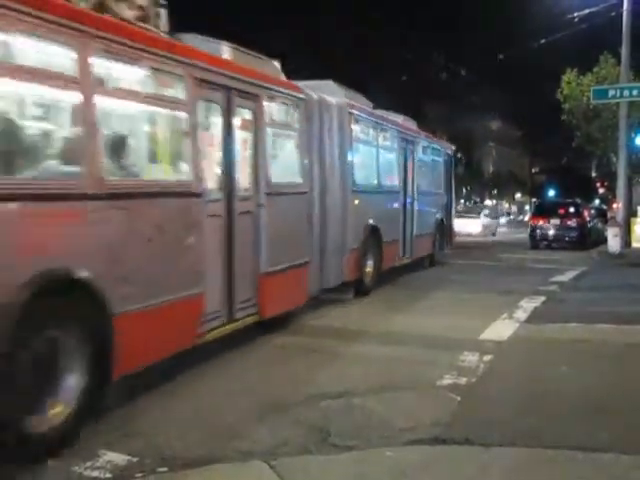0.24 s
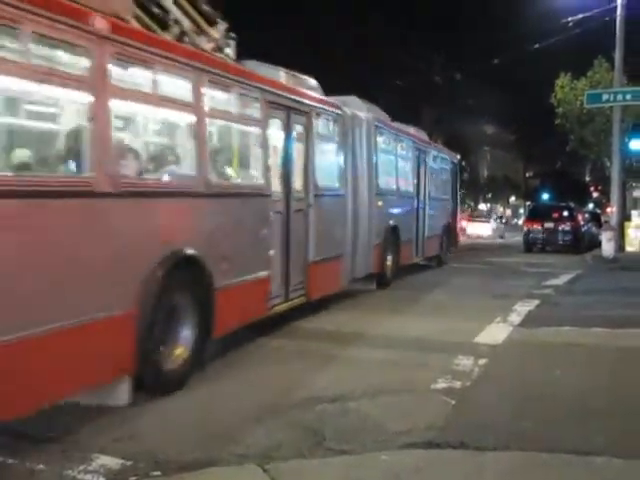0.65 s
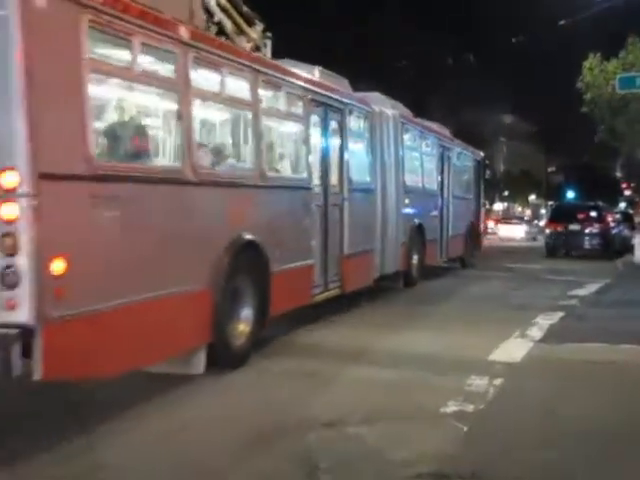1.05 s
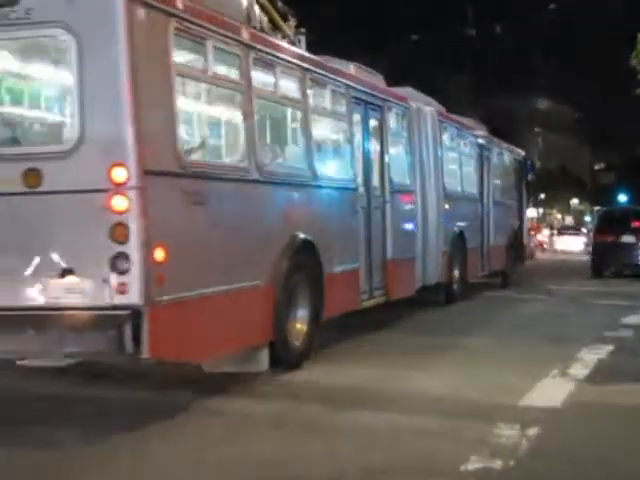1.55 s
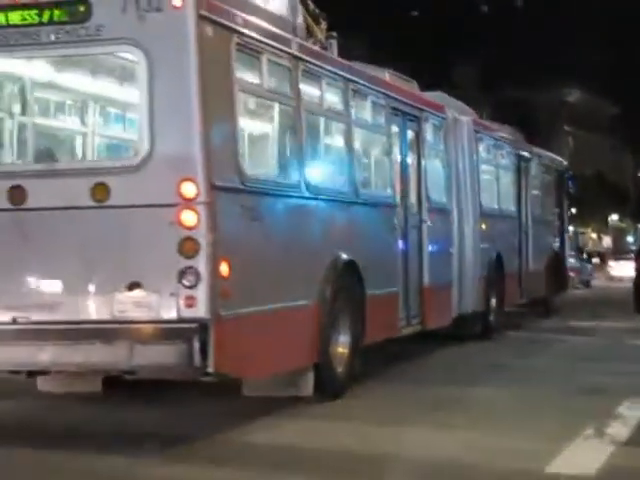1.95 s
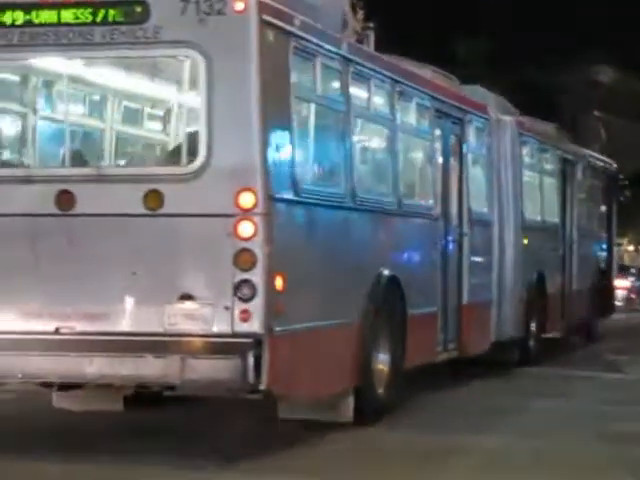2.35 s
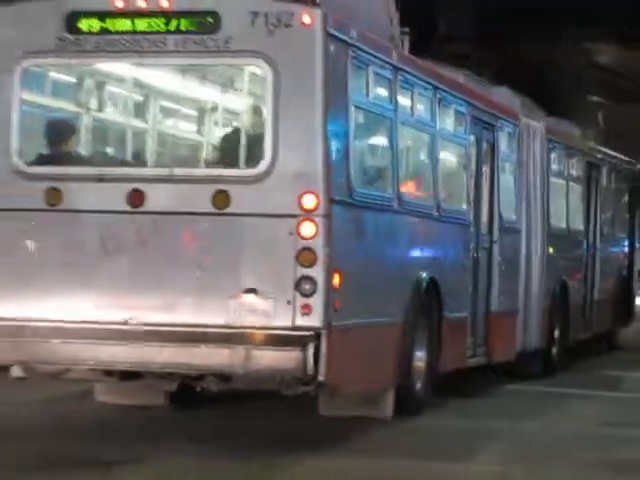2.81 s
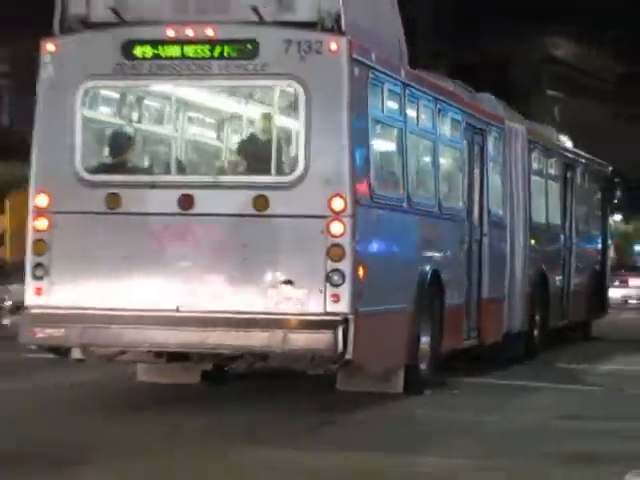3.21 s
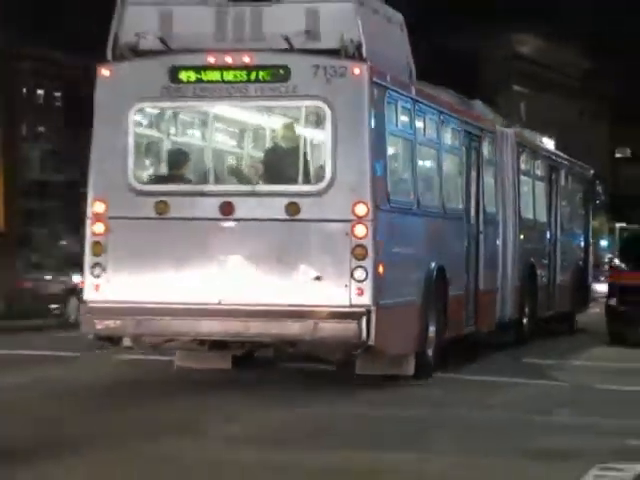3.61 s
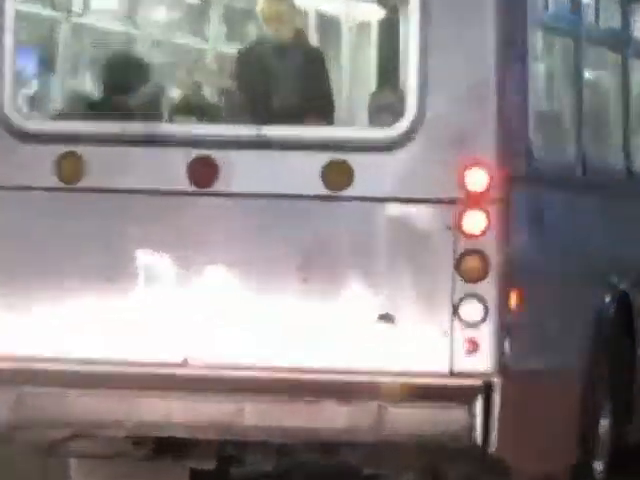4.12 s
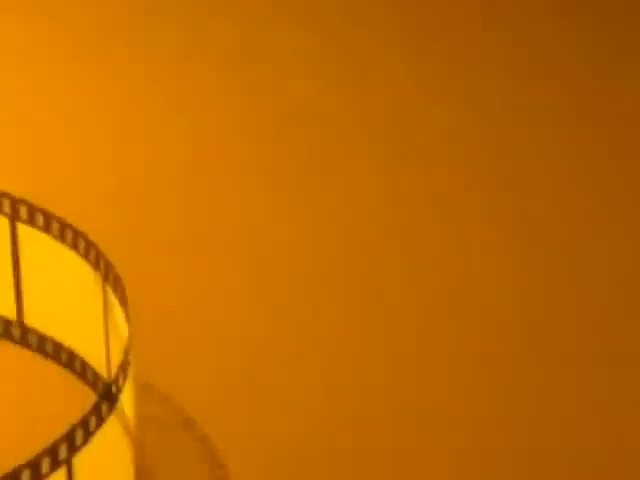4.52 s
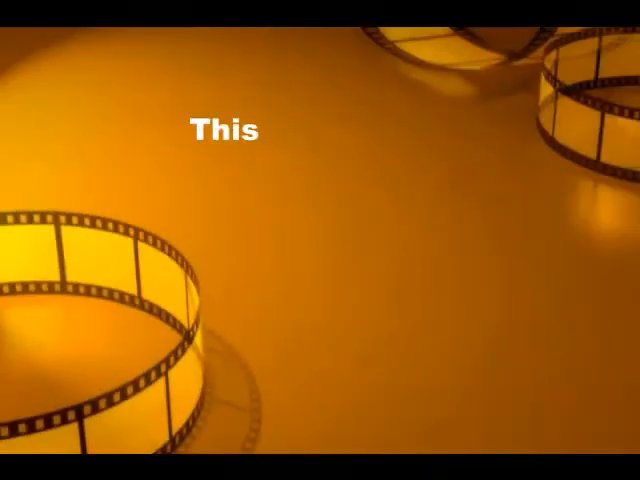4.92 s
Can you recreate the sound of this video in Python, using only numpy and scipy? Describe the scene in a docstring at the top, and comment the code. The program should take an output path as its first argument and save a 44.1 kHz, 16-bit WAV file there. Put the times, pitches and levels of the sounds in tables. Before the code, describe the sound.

Heard from the kerbside, a big electric bus pulls away with a loud continuous rush of tyres, air and muffled rumble. The opening is brightest, with hissing vents, light rasps and faint high whines. Small rattling clicks and dull bumps dot the pass; the roar swells and flutters slightly. A low fan hum hides under the later part, then everything fades evenly. Close open-air stereo pickup, no speech.

```python
"""An articulated trolleybus rolls close past the listener and pulls away along a street.
From the start, shaped noise makes body rumble, tyre roar, cooling air and hiss. Vents, rasps and a squeal
pass early, overlapped by sine whistles and a thin switching whine; resonant clicks, bumps and low hum join.
The wire sizzles now and then in noise swells; the tail fan drones in the later part. A fade-out ends it."""
import sys
import numpy as np
from scipy import signal
from scipy.fft import rfft, irfft, next_fast_len
from scipy.io import wavfile
from scipy.ndimage import uniform_filter1d, map_coordinates

SR = 44100
rng = np.random.default_rng(int(sys.argv[2]) if len(sys.argv) > 2 else 0)


def generate_wav(signal):
    """Clip the signal to [-1, 1] and save it as 16-bit WAV at the path in sys.argv[1]."""
    frames = np.transpose(np.atleast_2d(signal))
    scaled = np.clip(frames, -1, 1) * 32767
    pcm = np.round(scaled).astype(np.int16)
    wavfile.write(sys.argv[1], SR, pcm)


N = 227600
T = np.arange(N) / SR  # s

# stereo width of all noise: freq_hz, side_minus_mid_db
STEREO_WIDTH = [(60, -13.5), (99, -18), (160, -22.5), (270, -20), (450, -14.5), (740, -14), (1220, -8),
                (2010, -3.5), (3320, -1.5), (5480, 2), (9050, 1.5), (14900, 2.5)]
# stereo balance of all noise: freq_hz, left_minus_right_db
STEREO_LEAN = [(60, .3), (200, -.5), (700, -.7), (1290, -1.8), (2370, .8), (4400, -.5), (8000, -3),
               (14000, -2.5)]

# body rumble spectrum: freq_hz, relative_density_db
RUMBLE_SPECTRUM = [(15, -56), (24, -34), (45, -18.5), (65, -12.5), (105, -5.5), (170, -6), (250, -1),
                   (295, -3), (370, -6.5), (450, -12), (600, -14.5), (1000, -84)]
# tyre roar spectrum: freq_hz, relative_density_db
TYRE_SPECTRUM = [(250, -32), (380, -17.5), (460, -8.5), (540, -3), (630, 0.5), (780, 0), (990, 1),
                 (1150, -3.5), (1350, -13), (1700, -23), (2800, -84.5)]
# cooling air spectrum: freq_hz, relative_density_db
AIR_SPECTRUM = [(650, -13), (1100, -3.5), (1320, -1.5), (1560, -1), (1920, -4.5), (2260, -4), (2910, -15),
                (3300, -18.5), (4290, -31.5), (7260, -120)]
# rolling hiss spectrum: freq_hz, relative_density_db
HISS_SPECTRUM = [(2400, -38), (3000, -1), (3800, 0.5), (4400, -2), (5100, -6.5), (6500, -10.5), (8000, -14),
                 (9500, -19), (10800, -30.5), (12500, -56.5)]
# swells (+) and dips (-) of the tyre roar: peak_s, half_length_s, change_db
TYRE_SWELLS = [(.56, .04, .7), (.69, .06, 1.3), (.92, .04, 1.5), (1.06, .04, 2), (1.21, .04, 3.3),
               (1.35, .04, 1), (1.85, .14, 2), (2.08, .06, -1), (2.28, .07, 2.2), (2.42, .04, 1.7),
               (2.8, .068, 1.2), (3.16, .04, 2), (3.26, .08, 1.8), (3.55, .11, -1.6), (3.77, .05, 1.2)]
RUMBLE_DB, TYRE_DB, AIR_DB, HISS_DB = -25, -20.5, -20, -35.5  # before dips, swells and road grain
RUMBLE_RISE_DB, RUMBLE_RISE_S = 0.3, .6  # rear wheels come near
RUMBLE_DIP_DB, RUMBLE_DIP_S, RUMBLE_DIP_HALF_S = -1.2, 2.15, .3  # tail swings round
TYRE_RISE_DB, TYRE_RISE_S = 2, 0.96  # rear axle rolls by
AIR_RISE_DB, AIR_RISE_S = 4, 1.9  # tail turns toward the listener
SWELL_AIR_SHARE = 0.24  # share of the tyre-swell dB that reaches the cooling air
FLANK_DB, FLANK_HALF_S = 2, 0.52  # extra hiss while the flank is close
SHADE_DB, SHADE_S, SHADE_HALF_S = -1.5, .8, 0.14  # closed rear panel nearest

# vent hiss spectrum: freq_hz, relative_density_db
VENT_SPECTRUM = [(2000, -37), (3300, -3), (5000, 3.5), (7000, -4), (9000, -2), (11000, -2.5),
                 (13000, -13.5), (14000, -42)]
# side vents going by: nearest_s, half_length_s, peak_db
VENT_PASSES = [(.02, 0.22, -36), (.47, 0.098, -38)]
VENT_PATCHY_DB = 1.5

# rasps of the passing flank: peak_s, half_length_s, centre_hz, half_width_hz, peak_db
FLANK_RASPS = [(.08, 0.17, 3780, 450, -48), (.47, .08, 3600, 498, -43)]

# squeal pitch: time_s, pitch_hz
SQUEAL_PITCH = [(0, 7540), (.1, 7610), (.19, 7520), (.26, 7610), (.34, 7670), (.5, 7620)]
SQUEAL_S, SQUEAL_HALF_S, SQUEAL_HALF_WIDTH_HZ, SQUEAL_DB = .21, .23, 65, -45

# drive whistles as they face the listener: peak_s, half_length_s, pitch_hz (before Doppler), peak_db
DRIVE_WHISTLES = [(.34, .1, 6066, -50), (.8, .42, 6062, -48), (.78, .28, 5864, -48.5),
                  (1.37, .16, 5864, -47.5), (1.68, .4, 5862, -51.5)]
# breathy whistles beamed sideways: nearest_s, half_length_s, centre_hz, half_width_hz, peak_db
SIDE_BEAMS = [(.265, .03, 9470, 60, -46), (.5, .08, 9470, 45, -49), (.42, .17, 5935, 80, -45.5),
              (.72, .12, 5910, 70, -50)]
DOPPLER_SHARE = .004  # pitch swing either way
PASS_S, PASS_HALF_S = .6, .5

# switching whine: centre_hz (before drift), half_width_hz, base_db, near_swell_db
SWITCHING_BANDS = [(14660, 75, -58, 13), (14910, 60, -59, 4)]
# drift of both bands: time_s, offset_hz
SWITCHING_DRIFT = [(.3, 150), (.55, 50), (.9, 10), (1.9, 0), (2.5, 35)]
SWITCH_ON_S, SWITCH_OFF_S, SWITCH_EDGE_S = 0.26, 2.75, .08  # motor pulling
SWITCH_NEAR_S, SWITCH_NEAR_HALF_S = .88, .22  # cabinet nearest

# clicks of fittings: start_s, gain_db, centre_hz, half_width_hz, t60_s, left_minus_right_db
FITTING_CLICKS = [(.342, -31, 4650, 1300, .05, 0), (.355, -31, 4650, 1300, .03, 0),
                  (.7195, -12.3, 2750, 1250, .016, 10), (2.582, -23, 3216, 1600, .03, 0),
                  (3.136, -25, 3000, 1200, .04, 0), (3.405, -28.5, 4250, 1400, .035, 0),
                  (3.467, -29.5, 4100, 1700, .03, 0)]

# short bumps and one longer body hum: peak_s, half_length_s, centre_hz, half_width_hz, peak_db
LOW_BUMPS = [(.39, 0.024, 55.4, 30, -32), (.755, 0.018, 106, 35, -23), (1.1, 0.22, 264, 45, -30),
             (1.64, 0.034, 246, 35, -25), (3.39, 0.019, 186.6, 110, -25.5), (3.83, 0.028, 170, 110, -27.5)]

# low roar and hum, overlapping bands: peak_s, half_length_s, centre_hz, half_width_hz, peak_db
ROAR_BANDS = [(1.1, 0.55, 910, 70, -31), (1.68, 0.48, 790, 140, -24), (1.8, .55, 520, 60, -31.5),
              (2.1, 0.46, 112.3, 14, -36.5), (2.75, 0.6, 510, 30, -32.5), (3.2, 0.62, 384, 52, -34)]

# sizzles on the overhead wire: peak_s, half_length_s, centre_hz, half_width_hz, level_db (before crackle)
WIRE_SIZZLES = [(.93, .018, 10000, 1700, -43.5), (.923, .008, 8620, 170, -39.5),
                (1.8, .15, 7000, 2600, -44), (1.82, .11, 11000, 1400, -55), (3.18, .016, 9100, 2100, -41.5)]
CRACKLE_DB = 1.8

FAN_HZ, FAN_HALF_WIDTH_HZ, FAN_DB = 152, 24, -35.5
FAN_S, FAN_EDGE_S = 2.52, .06  # tail comes into view

FADE_START_S, FADE_LENGTH_S = 3.838, 0.95
END_S, CLOSE_S = 4.679, .004  # final decay: start, time constant
TOP_HZ = 15600


def amp(db):
    """dB to gain."""
    return 10 ** (np.asarray(db) / 20)


def unit(x):
    """x at rms 1."""
    return x / np.sqrt(np.mean(x ** 2) + 1e-20)


def along(points, hz):
    """Interpolate (Hz, value) points on a log-frequency axis."""
    freq_hz, values = np.transpose(points)
    return np.interp(np.log(hz + 1), np.log(freq_hz + 1), values)


def wobble(rate_hz):
    """Smooth random curve with rate_hz knots a second."""
    knots = rng.standard_normal(int(N * rate_hz / SR) + 4)
    return map_coordinates(knots, [T * rate_hz])


def bell(peak_s, half_s):
    """Gaussian gain, 1 at peak_s and 1/e half_s away."""
    return np.exp(-((T - peak_s) / half_s) ** 2)


def rise(depth_db, length_s):
    """Level that climbs from depth_db below to 0 dB and holds."""
    return -depth_db * np.maximum(1 - T / length_s, 0)


def passing(rows):
    """Summed gain of things going by."""
    return sum(amp(db) * bell(s, half_s) for s, half_s, db in rows)


def filtered(x, response):
    """Filter x by a gain function of frequency, zero-padded."""
    size = next_fast_len(N + SR // 2)
    gain = response(np.fft.rfftfreq(size, 1 / SR))
    return irfft(rfft(x, size) * gain, size)[..., :N]


def stereo(pair, colour):
    """Colour two noises as mid (rms 1) and side: bass near mono, treble wide."""
    def mid_side_gain(hz):
        return colour(hz) * amp([0 * hz, along(STEREO_WIDTH, hz)])

    def lean_gain(hz):
        return amp(np.outer([.5, -.5], along(STEREO_LEAN, hz)))

    mid, side = filtered(pair, mid_side_gain)
    left_right = np.array([mid + side, mid - side])
    return filtered(left_right, lean_gain) / np.std(mid)


def rush(spectrum, patchy_db):
    """Turbulent noise: random gain patches in time and frequency, then a spectrum."""
    grid = signal.stft(rng.standard_normal((2, N)), nperseg=512)[2]
    patches = rng.standard_normal(grid.shape[1:])
    patches = uniform_filter1d(patches, size=6, axis=0)
    patches = uniform_filter1d(patches, size=12, axis=1, mode="wrap")
    patchy = grid * amp(patchy_db * unit(patches))
    pair = signal.istft(patchy, nperseg=512)[1][:, :N]
    return stereo(pair, lambda hz: amp(along(spectrum, hz)))


def narrow(peaks):
    """Noise in resonances (centre_hz, half_width_hz, db)."""
    def colour(hz):
        return sum(amp(db) / (1 + ((hz - centre_hz) / half_width_hz) ** 2) ** 2
                   for centre_hz, half_width_hz, db in peaks)

    return stereo(rng.standard_normal((2, N)), colour)


def swells(rows):
    """Resonant noises that rise and fall around their moments."""
    return sum(amp(db) * bell(s, half_s) * narrow([(hz, half_width_hz, 0)])
               for s, half_s, hz, half_width_hz, db in rows)


def shifted(x, shift_hz):
    """Shift x in frequency by a curve, via its analytic signal."""
    phase = 2 * np.pi * np.cumsum(shift_hz) / SR
    return np.real(signal.hilbert(x) * np.exp(1j * phase))


def line(hz, flutter_db):
    """Sine whistle fluttering separately in each channel as its echoes shift."""
    phase = 2 * np.pi * np.cumsum(hz) / SR
    channels = [amp(flutter_db * wobble(15)) * np.sin(phase + .7 * wobble(25)) for _ in range(2)]
    return unit(np.array(channels))


def rolling():
    """Body, tyre, air and hiss noise; road grain shakes the upper three together."""
    grain_db = 0.361 * wobble(12) + 0.42 * wobble(130)
    swell_db = sum(db * bell(s, half_s) for s, half_s, db in TYRE_SWELLS)

    body_db = RUMBLE_DB + rise(RUMBLE_RISE_DB, RUMBLE_RISE_S) + 0.38 * wobble(7.8)
    body_db += RUMBLE_DIP_DB * bell(RUMBLE_DIP_S, RUMBLE_DIP_HALF_S)
    tyre_db = TYRE_DB + rise(TYRE_RISE_DB, TYRE_RISE_S) + swell_db + grain_db
    air_db = AIR_DB + rise(AIR_RISE_DB, AIR_RISE_S) + SWELL_AIR_SHARE * swell_db + grain_db
    hiss_db = HISS_DB + FLANK_DB * bell(0, FLANK_HALF_S) + grain_db
    hiss_db += SHADE_DB * bell(SHADE_S, SHADE_HALF_S)

    body = amp(body_db) * rush(RUMBLE_SPECTRUM, patchy_db=0.5)
    tyres = amp(tyre_db) * rush(TYRE_SPECTRUM, patchy_db=-1.0)
    air = amp(air_db) * rush(AIR_SPECTRUM, patchy_db=0.71)
    hiss = amp(hiss_db) * rush(HISS_SPECTRUM, patchy_db=0.9)
    return body + tyres + air + hiss


def vents():
    """Turbulent air from each side vent, bright while it faces the listener."""
    return passing(VENT_PASSES) * rush(VENT_SPECTRUM, VENT_PATCHY_DB)


def rasps():
    """The passing flank rasps in short swells of resonant noise."""
    return swells(FLANK_RASPS)


def squeal():
    """Narrow, breathy noise band that wanders in pitch."""
    centre_hz = np.mean([hz for _, hz in SQUEAL_PITCH])
    drift_hz = np.interp(T, *np.transpose(SQUEAL_PITCH)) - centre_hz
    band = narrow([(centre_hz, SQUEAL_HALF_WIDTH_HZ, 0)])
    return amp(SQUEAL_DB) * bell(SQUEAL_S, SQUEAL_HALF_S) * shifted(band, drift_hz)


def drive():
    """Power electronics: sines whose pitch sinks in passing, plus narrow noise beams."""
    doppler = 1 - DOPPLER_SHARE * np.tanh((T - PASS_S) / PASS_HALF_S)
    whistles = sum(amp(db) * bell(s, half_s) * line(hz * doppler, flutter_db=-1.0)
                   for s, half_s, hz, db in DRIVE_WHISTLES)
    return whistles + swells(SIDE_BEAMS)


def switching():
    """Thin whine in two unsteady noise bands that drift in pitch while the motor pulls."""
    pulling = np.clip(np.minimum(T - SWITCH_ON_S, SWITCH_OFF_S - T) / SWITCH_EDGE_S, 0, 1)
    near = bell(SWITCH_NEAR_S, SWITCH_NEAR_HALF_S)
    bands = sum(amp(db + swell_db * near + 3 * wobble(14)) * narrow([(hz, half_width_hz, 0)])
                for hz, half_width_hz, db, swell_db in SWITCHING_BANDS)
    drift_hz = np.interp(T, *np.transpose(SWITCHING_DRIFT)) + 22 * wobble(12)
    return pulling * shifted(bands, drift_hz)


def fittings():
    """Each click is a noise burst in one broad resonance, quickly damped."""
    out = np.zeros((2, N))
    for start_s, gain_db, hz, half_width_hz, t60_s, lean_db in FITTING_CLICKS:
        age_s = np.maximum(T - start_s, 0)
        attack = 1 - np.exp(-age_s / .0004)
        shape = attack * amp(-60 * age_s / t60_s)
        burst = unit(shape * narrow([(hz, half_width_hz, 0)])) * np.std(shape)
        side_db = lean_db * np.array([[.5], [-.5]])
        out += amp(gain_db + side_db) * burst
    return out


def bumps():
    """Low resonant noise: short bumps and one longer body hum."""
    return swells(LOW_BUMPS)


def roar_and_hum():
    """Low roar and hum: overlapping resonant noise bands that slowly swell and sink."""
    return swells(ROAR_BANDS)


def shoes():
    """Collector shoes scrape the wire: noise swells with fast, uneven gain."""
    crackle = unit(amp(CRACKLE_DB * wobble(300)))
    return swells(WIRE_SIZZLES) * crackle


def fan():
    """Tail fan drones as low narrow noise once the back of the bus is in view."""
    in_view = .5 + .5 * np.tanh((T - FAN_S) / FAN_EDGE_S)
    return amp(FAN_DB) * in_view * narrow([(FAN_HZ, FAN_HALF_WIDTH_HZ, 0)])


def scene():
    """Sum of everything the passing bus gives off."""
    early = rolling() + vents() + rasps() + squeal()
    passing_by = drive() + switching() + fittings() + bumps()
    late = roar_and_hum() + shoes() + fan()
    return early + passing_by + late


def record(dry):
    """Straight fade-out, quick final decay and band limit."""
    fade = np.clip(1 - (T - FADE_START_S) / FADE_LENGTH_S, 0, 1)
    close = np.exp(-np.maximum(T - END_S, 0) / CLOSE_S)
    return filtered(dry * fade * close, lambda hz: hz < TOP_HZ)


dry = scene()
out = record(dry)
generate_wav(out)
```